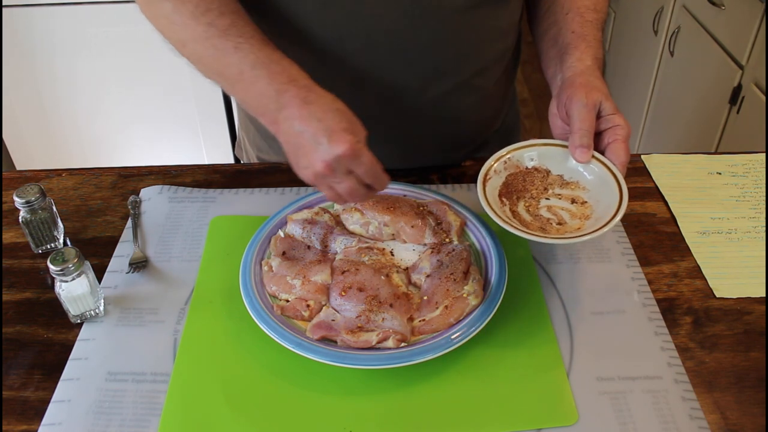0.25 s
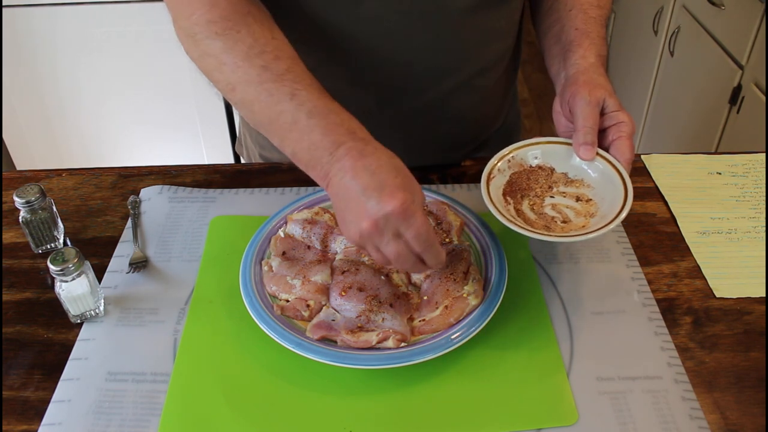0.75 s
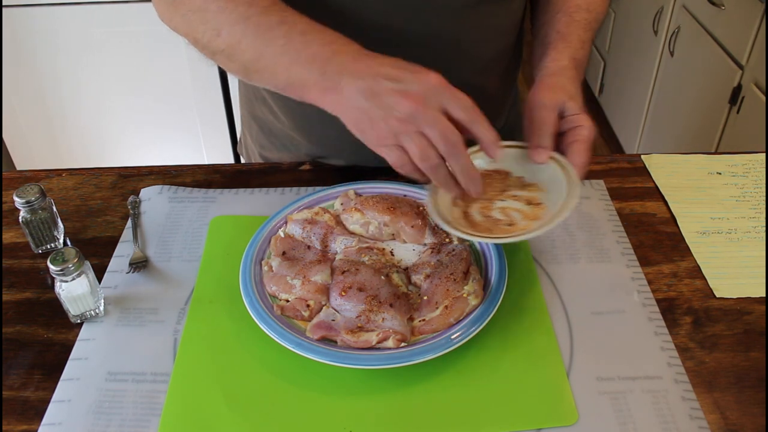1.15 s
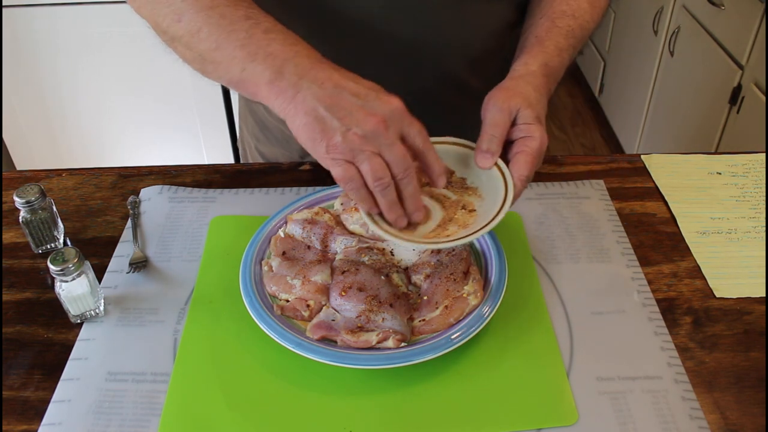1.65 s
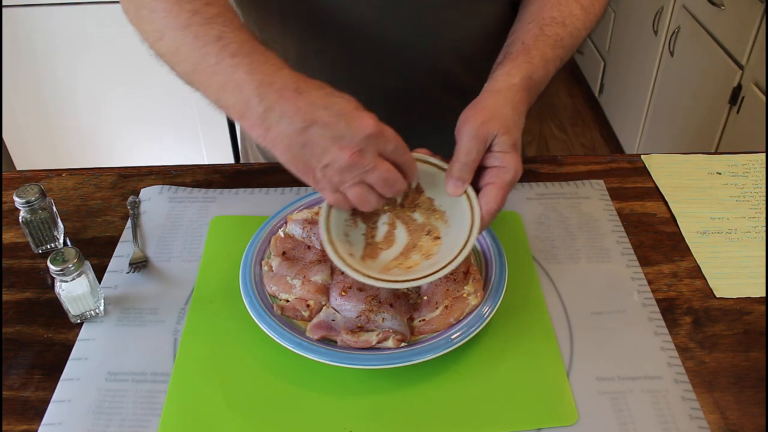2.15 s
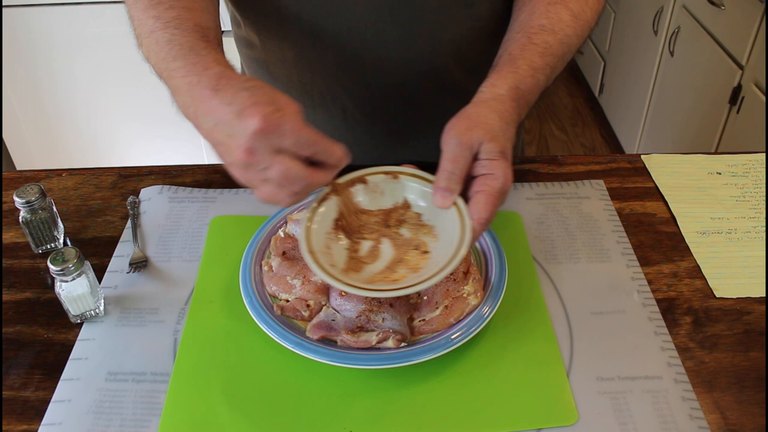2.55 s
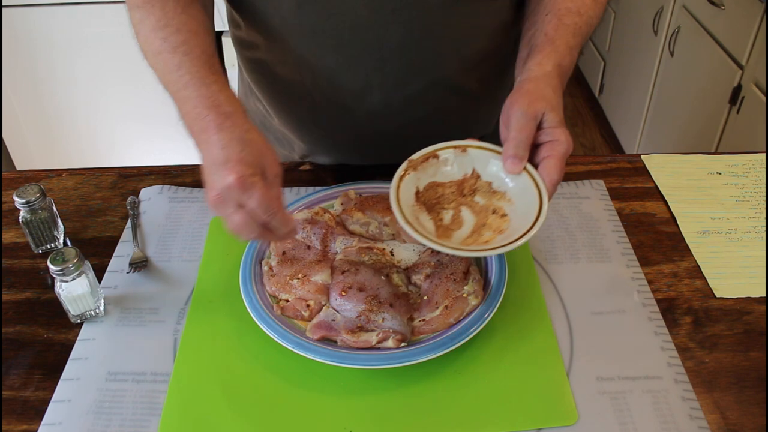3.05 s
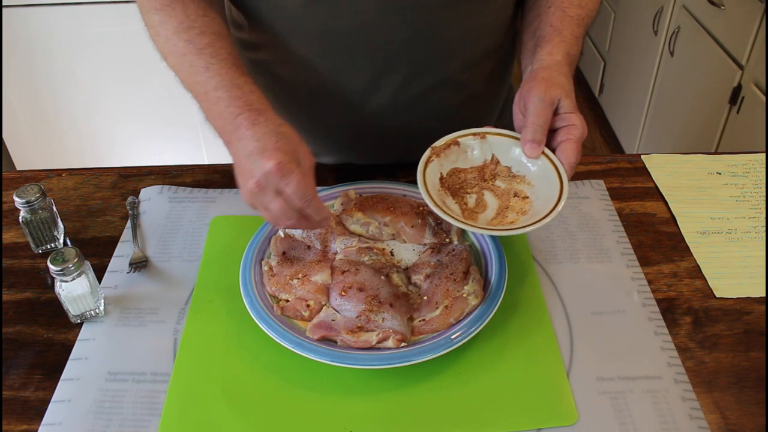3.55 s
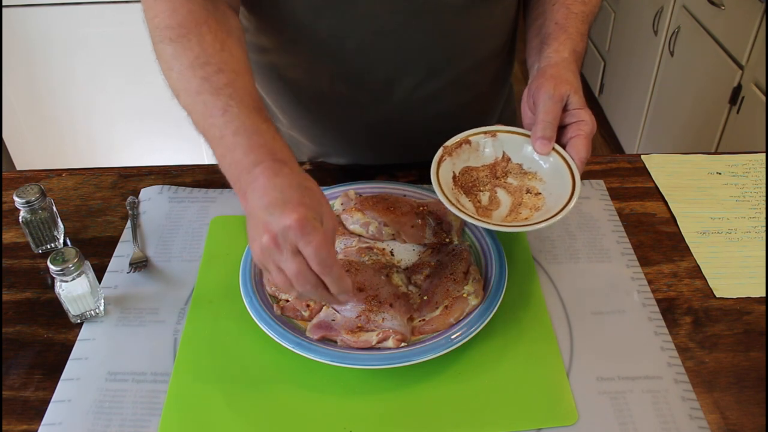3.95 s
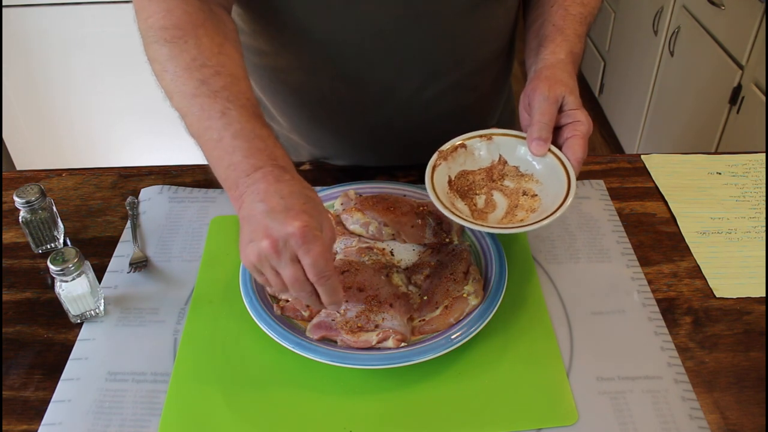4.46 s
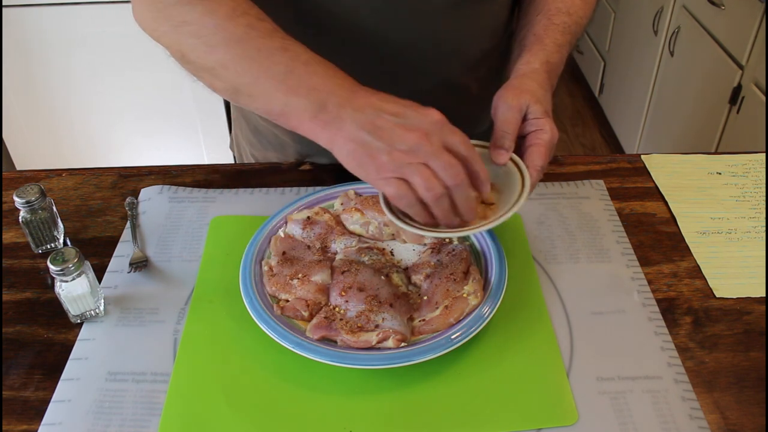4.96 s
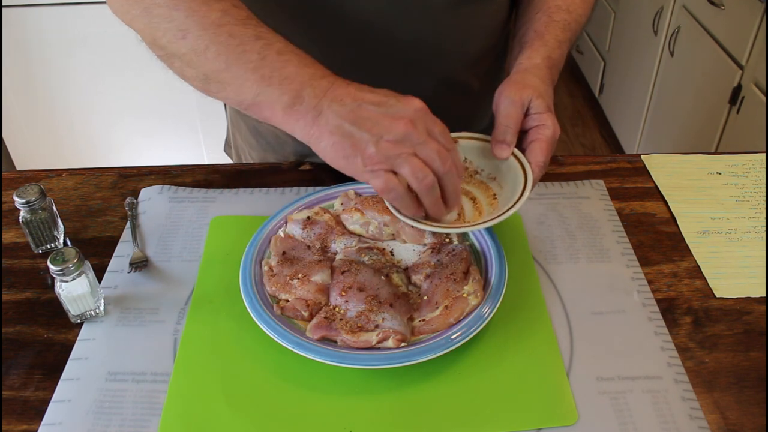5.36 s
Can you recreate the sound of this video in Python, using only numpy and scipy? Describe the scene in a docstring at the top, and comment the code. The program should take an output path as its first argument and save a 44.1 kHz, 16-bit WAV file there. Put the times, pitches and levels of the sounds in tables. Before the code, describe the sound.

A quiet home kitchen, close microphone, with faint hum and hiss. A wooden drawer rattles shut across the room. Fingers rub and sprinkle dry spice, then scrape in a small ceramic bowl with bright clinks. Later a stove knob clacks, four loud sharp igniter snaps crack evenly, the flame flutters low, and the knob clicks back with a brief gas hiss.

```python
"""Fingers pinch dry spice from a small ceramic bowl and sprinkle it over meat in a quiet kitchen: shaped
grain noise rubs skin and rolls grit, and rings the bowl's modes. First a drawer bumps shut across the room
(noise bursts through box modes). Later a gas ring is lit: the knob clicks (damped modes), the igniter sparks
four times (short snaps in a room response); the flame catches with a flutter after the third spark (low noise
puffs); the knob snaps back and the gas hisses (resonant noise). Room tone, hum and a rustling shirt lie below."""
import sys
import numpy as np
from scipy import signal
from scipy.fft import rfft, irfft
from scipy.io import wavfile
from scipy.ndimage import uniform_filter1d, minimum_filter1d

SR = 44100
rng = np.random.default_rng(int(sys.argv[2]) if len(sys.argv) > 2 else 0)


def pcm_store(signal):
    """Save signal as 16-bit PCM."""
    levels = np.round(np.clip(np.atleast_2d(signal), -1, 1) * 32767)
    wavfile.write(sys.argv[1], SR, levels.astype(np.int16).T)


N = 246519
TIME = np.arange(N) / SR

# modes of the small hand-held bowl: mode_hz, width_hz, level_db
BOWL_MODES = [(2930, 55, -1), (4450, 160, -1), (5100, 54, 7), (6030, 140, -22), (7340, 62, -6),
              (7560, 56, -4), (9440, 51, -7.5), (10700, 90, -14), (12400, 100, -9), (14380, 90, -8)]
# gas valve clacks and lets gas through the jet: start_s, clack_db, clack_hz, hiss_db, hiss_length_s
VALVE_CLACKS = [(3.914, -24.5, 1380, -57.5, 0.05), (5.367, -21, 1570, -52.5, 0.16)]


def from_db(db):
    """Decibels to gain."""
    return 10 ** (np.asarray(db) / 20)


def unit(h):
    """Scale a response to an energy of one."""
    return h / np.sqrt(np.sum(h ** 2) + 1e-20)


def through(x, h):
    """Pass a sound through an impulse response."""
    return signal.fftconvolve(x, h)[:N]


def at_hz(points, hz):
    """Read a table on a log-frequency axis."""
    point_hz, value = np.transpose(points)
    return np.interp(np.log(hz + 1), np.log(point_hz), value)


def colour(spectrum, size=4096):
    """Causal, minimum-phase response with the given spectrum, rows of (Hz, dB)."""
    magnitude = from_db(at_hz(spectrum, np.fft.rfftfreq(size, 1 / SR)))
    cepstrum = irfft(np.log(magnitude))
    # fold the cepstrum onto positive time
    cepstrum[1:size // 2] *= 2
    cepstrum[size // 2 + 1:] = 0
    return unit(irfft(np.exp(rfft(cepstrum))))


def ringing(modes, size=6000):
    """Response of damped modes with alternating sign, rows of (Hz, width Hz, dB)."""
    t = TIME[:size]
    total = np.zeros(size)
    for k, (hz, width_hz, db) in enumerate(modes):
        mode = np.sin(2 * np.pi * hz * t) * np.exp(-np.pi * width_hz * t)
        total += (-1) ** k * from_db(db) * unit(mode)
    return unit(total)


def add(out, start_s, sound):
    """Mix a short sound in at its start time."""
    i = max(int(round(start_s * SR)), 0)
    out[i:i + len(sound)] += sound[:N - i]


def bursts(rows, rise_s):
    """Noise that swells quickly and dies away, rows of (start s, dB, decay s)."""
    power = np.zeros(N)
    t = TIME[:SR]
    for start_s, db, decay_s in rows:
        envelope = from_db(db) * (1 - np.exp(-t / rise_s)) * np.exp(-t / decay_s)
        add(power, start_s, envelope ** 2)
    return np.sqrt(power) * rng.standard_normal(N)


def grains(per_s, spread_db):
    """Random tiny clicks of uneven size, rms one."""
    size_db = spread_db * np.minimum(rng.exponential(1, N), 4)
    sizes = from_db(size_db) * rng.choice([-1, 1], N)
    present = rng.random(N) < per_s / SR
    return unit(sizes * present) * np.sqrt(N)


def swells(rows):
    """Gain of smooth movements that rise and fall, rows of (middle s, length s, dB)."""
    power = np.zeros(N)
    for middle_s, length_s, db in rows:
        phase = np.pi * np.clip((TIME - middle_s) / length_s, -.5, .5)
        power += (from_db(db) * np.cos(phase)) ** 2
    return np.sqrt(power)


def stroke(start_s, length_s, peak_share=0.28):
    """Power of a finger stroke: pressure builds quickly and eases off."""
    corners_s = [start_s, start_s + length_s * peak_share, start_s + length_s]
    return np.interp(TIME, corners_s, [0, 1, 0]) ** 1.3


def kitchen(build_s):
    """Diffuse tail: it builds up as sound crosses the room, then dies soonest in the treble."""
    # decay by band: centre_hz, t60_s
    band_decays = [(150, 0.62), (700, 0.42), (2000, 0.51), (4000, 0.39), (7000, 0.31), (10500, 0.27),
                   (15000, 0.22)]
    t = TIME[:SR]
    white = rfft(rng.standard_normal(len(t)))
    hz = np.fft.rfftfreq(len(t), 1 / SR)
    tail = np.zeros(len(t))
    for k, (_, t60_s) in enumerate(band_decays):
        share = at_hz([(centre_hz, j == k) for j, (centre_hz, _) in enumerate(band_decays)], hz)
        tail += irfft(white * share, len(t)) * from_db(-60 * t / t60_s)
    return unit(tail * (1 - np.exp(-t / build_s)))


def background(air_db=-59, hum_hz=60.6, hum_db=-54):
    """Still air, mains hum and the soft sounds of a moving cook, as coloured noise and a sine."""
    # still air: freq_hz, density_db
    air_spectrum = [(20, -4), (36, 0), (55, 7), (80, 1.5), (130, 2.5), (250, -0.5), (310, 1.5), (375, -3),
                    (600, -5), (1080, -3.5), (1800, -11), (3200, -12.5), (5000, -14), (8000, -19),
                    (16000, -21)]
    # cloth: freq_hz, density_db
    cloth_spectrum = [(100, -10), (245, -12.5), (310, 6), (370, 1), (560, 0.5), (800, -10.5), (1200, -7.5),
                      (2200, -14), (4000, -17.5), (9000, -23)]
    # shirt rustles with each move of the arms: middle_s, length_s, level_db
    arm_moves = [(0.05, 1.2, -60), (1.35, 1.5, -63.5), (2.17, 0.81, -57), (2.75, 0.62, -62.5),
                 (3.4, 0.38, -66), (4.3, 2.2, -67), (5.25, 1.14, -56.5)]
    # bowl is pushed into the hand that holds it: start_s, level_db, decay_s
    bowl_thud = (1.797, -48, 0.044)
    # a faint hollow rustle, and later a short hollow rub: middle_s, length_s, level_db
    hollow_rubs = [(1.25, 1, -61.5), (2.69, 0.065, -59.5)]
    # resonances of these two: mode_hz, width_hz, level_db
    hollow_modes = [(1135, 180, -2.5), (2040, 260, -0.5), (2700, 1100, -6), (4400, 500, -7.5)]

    air = from_db(air_db) * through(rng.standard_normal(N), colour(air_spectrum))
    hum = from_db(hum_db) * np.sqrt(2) * np.sin(2 * np.pi * hum_hz * TIME)
    rustle = swells(arm_moves) * rng.standard_normal(N)
    soft = rustle + bursts([bowl_thud], rise_s=0.0026)
    hollow = swells(hollow_rubs) * through(rng.standard_normal(N), ringing(hollow_modes))
    return air + hum + through(soft, colour(cloth_spectrum)) + hollow


def drawer(modes_db=-2):
    """Rattling contacts shake the wooden box."""
    # rolling, then bumping the stop: start_s, level_db, decay_s
    bumps = [(0, -50.5, 0.13), (.123, -33, 0.017), (.149, -32, 0.019), (.258, -33, 0.017),
             (.2715, -29, 0.019), (.31, -41, 0.041)]
    # broad colour of the box: freq_hz, density_db
    box_spectrum = [(60, -18), (150, -13), (250, -17), (330, 4.5), (600, 1.5), (900, 0), (1100, -4.5),
                    (1300, -8.5), (1700, -11), (2300, -14), (3100, -17.5), (4200, -22.5), (6500, -30),
                    (12000, -52)]
    # modes of the box: mode_hz, width_hz, level_db
    box_modes = [(331.7, 32.5, 1.5), (572.6, 8, -2), (685, 14, -12.5), (801, 28, -0.5), (890, 63, -9.5),
                 (1016, 23, -3.5), (3000, 64, -26)]
    box = unit(colour(box_spectrum) + from_db(modes_db) * ringing(box_modes, size=4096))
    return through(bursts(bumps, rise_s=0.00054), box)


def bare_glaze(sweep_s=0.42):
    """Share of the glaze swept clear under the fingers, 0-1; it starts anew with each dip."""
    # hand dips into the bowl: start_s
    dips = [1.4, 5.2]
    bare = np.zeros(N)
    for start_s in dips:
        swept = 1 - np.exp(-np.maximum(TIME - start_s, 0) / sweep_s)
        bare = np.where(TIME > start_s, swept, bare)
    return bare


def fingers(sprinkle_s=0.09, bare_grit_db=-6, bare_ring_db=0.5, covered_ring_db=-15):
    """Strokes rub skin and roll grit; in the bowl the grains ring the glaze more as it is swept bare."""
    # fingertips rub a pinch out over the meat: start_s, skin_rub_db, falling_grit_db
    sprinkles = [(.53, -60, -68), (.626, -58.5, -59), (.822, -56, -54.5), (2.865, -69, -71),
                 (2.975, -65, -69), (3.292, -62, -71), (3.455, -61.5, -70), (3.62, -59, -65.5)]
    # fingers scrape through the spice on the glaze: start_s, length_s, skin_rub_db, spice_db
    scrapes = [(1.423, .14, -67, -53.5), (1.499, 0.045, -55.5, -48), (1.679, .085, -51, -70),
               (1.785, 0.087, -49, -49.5), (1.845, 0.24, -59.5, -56.5), (2.131, 0.17, -60, -61),
               (2.232, .2, -58.5, -61.5), (2.512, 0.062, -77, -59.5), (5.164, 0.14, -80, -58),
               (5.54, 0.1, -78, -54.5)]
    # fingernails touch the bowl: start_s, tap_db, tap_hz, ring_db
    nails = [(1.533, -28, 4230, -38), (1.584, -29, 2900, -46), (1.702, -42, 4000, -42),
             (1.8024, -23.5, 890, -40), (2.2777, -26.5, 1200, -26), (2.318, -24, 1270, -21)]
    # skin friction: freq_hz, density_db
    skin_spectrum = [(200, -23), (450, -1), (900, 1), (1400, 3), (2200, 1), (3000, 2.5), (4000, -3),
                     (5500, -1.5), (7200, -11), (8500, -18), (16000, -21)]
    # grit friction: freq_hz, density_db
    grit_spectrum = [(1000, -52), (2500, -20), (4500, 5), (7000, 9), (9000, 2), (13000, 3), (16000, -4)]

    rub_power, falling_power, scraping_power = np.zeros((3, N))
    for start_s, rub_db, grit_db in sprinkles:
        power = stroke(start_s, sprinkle_s)
        rub_power += from_db(rub_db) ** 2 * power
        falling_power += from_db(grit_db) ** 2 * power
    for start_s, length_s, rub_db, spice_db in scrapes:
        power = stroke(start_s, length_s)
        rub_power += from_db(rub_db) ** 2 * power
        scraping_power += from_db(spice_db) ** 2 * power

    scraping = np.sqrt(scraping_power)
    bare = bare_glaze()
    grit_gain = np.sqrt(falling_power) + scraping * from_db(bare_grit_db * bare)
    ring_gain = scraping * from_db(bare_ring_db * bare + covered_ring_db * (1 - bare))
    crunch = grains(per_s=10000, spread_db=2.0)
    bowl = ringing(BOWL_MODES)
    out = through(np.sqrt(rub_power) * grains(per_s=12000, spread_db=2.5), colour(skin_spectrum))
    out += through(grit_gain * crunch, colour(grit_spectrum))
    out += through(ring_gain * crunch, bowl)
    for start_s, tap_db, tap_hz, ring_db in nails:
        tap = from_db(tap_db) * ringing([(tap_hz, 400, 0)])
        add(out, start_s, tap + from_db(ring_db) * bowl)
    return out


def rim_brush(start_s=1.329, length_s=0.071, level_db=-64):
    """On its way in, a finger brushes the clean rim, which rings freely."""
    friction = np.sqrt(stroke(start_s, length_s)) * rng.standard_normal(N)
    return from_db(level_db) * through(friction, ringing(BOWL_MODES))


def squeak(start_s=2.47, end_s=2.79, from_hz=3800, to_hz=4280, level_db=-70):
    """A fingertip slips off the glaze with a faint, rough, rising whistle."""
    along = np.clip((TIME - start_s) / (end_s - start_s), 0, 1)
    pitch_hz = from_hz + (to_hz - from_hz) * np.sin(np.pi / 2 * along)
    slow = signal.butter(2, 90, fs=SR, output="sos")
    waver = unit(signal.sosfilt(slow, rng.standard_normal(N))) * np.sqrt(2 * N)
    whistle = np.sin(2 * np.pi * np.cumsum(pitch_hz) / SR)
    return from_db(level_db) * np.sin(np.pi * along) * waver * whistle


def knock(db, hz, shudder_db, width_hz=75, panel_s=0.0091):
    """A hollow knock and a shudder of the sheet-metal panel behind it."""
    body = ringing([(hz, width_hz, 0)])
    t = TIME[:len(body)]
    shaking = rng.standard_normal(len(t)) * np.exp(-t / panel_s)
    shudder = through(shaking, ringing([(hz, 1300, 0)]))[:len(t)]
    return from_db(db) * body + from_db(shudder_db) * unit(shudder)


def knob(tick_width_hz=2700, rattle_db=-6, rattle_s=0.0049,
         overtone_ratio=2.42, overtone_width_hz=200, overtone_db=-1, valve_shudder_db=2.5):
    """Bright ticks with a brief rattle, knocks against the stops, and the two-toned clack of the valve."""
    # latch ticks: start_s, level_db, pitch_hz
    ticks = [(3.785, -20.5, 4400), (3.882, -29.5, 7160), (5.269, -25, 7600), (5.300, -35, 7200),
             (5.3239, -17.5, 5700), (5.331, -21.5, 6900), (5.3516, -21.5, 7340)]
    # knob knocks against its stops: start_s, knock_db, knock_hz, panel_shudder_db
    knocks = [(3.785, -20, 963, -26), (5.325, -24, 605, -18.5), (5.3312, -31, 880, -15),
              (5.3516, -25, 710, -19)]
    out, t = np.zeros(N), TIME[:SR // 10]
    for start_s, db, hz in ticks:
        contact = from_db(rattle_db) * unit(rng.standard_normal(len(t)) * np.exp(-t / rattle_s))
        contact[0] += 1
        latch = np.diff(ringing([(hz, tick_width_hz, 0)]))
        band = through(latch, latch)  # one broad band with steep edges
        add(out, start_s, from_db(db) * unit(through(band, contact)))
    for start_s, db, hz, shudder_db in knocks:
        add(out, start_s, knock(db, hz, shudder_db))
    for start_s, db, hz, _, _ in VALVE_CLACKS:
        add(out, start_s, knock(db, hz, db + valve_shudder_db))
        overtone = ringing([(hz * overtone_ratio, overtone_width_hz, 0)])
        add(out, start_s, from_db(db + overtone_db) * overtone)
    return out


def burner(attack_s=0.0033, release_s=0.029):
    """The flame catches in low puffs; after each clack of the valve the jet hisses in the mixing tube."""
    # flame runs round the burner in puffs: start_s, level_db, decay_s
    puffs = [(4.572, -34.5, 0.028), (4.618, -48, 0.028), (4.670, -43, 0.036), (4.718, -44.5, 0.045)]
    # flame: freq_hz, density_db
    flame_spectrum = [(40, -1), (90, -3), (170, 3), (250, -10), (340, 8), (480, -2), (700, 0), (1000, -6.5),
                      (2000, -14), (5000, -37)]
    # mixing tube: mode_hz, width_hz, level_db
    jet_modes = [(1310, 240, -6.5), (1820, 130, -0.5), (2500, 460, -2), (2900, 270, -4.5),
                 (3470, 160, -3.5), (4000, 180, -8.5), (5370, 530, -8.5)]
    flame = through(bursts(puffs, rise_s=0.0014), colour(flame_spectrum))
    flow = np.zeros(N)
    for start_s, _, _, hiss_db, length_s in VALVE_CLACKS:
        opening = np.clip((TIME - start_s) / attack_s, 0, 1)
        closing = np.exp(-np.maximum(TIME - start_s - length_s, 0) / release_s)
        flow += from_db(hiss_db) * opening * closing
    return flame + flow * through(rng.standard_normal(N), ringing(jet_modes))


def igniter(tail, scatter_db=1.0, scatter_s=0.012, tail_db=-3.5, stir_db=-10, cap_width_hz=3200,
            path_jitter_s=0.00003):
    """Sharp snaps take nearly the same paths through the kitchen, stirred a little by the moving cook."""
    # sparks: start_s, level_db, edge_db (added above 10.5 kHz), burner_cap_hz
    sparks = [(3.963, 9.5, 2.5, 7000), (4.2435, 11, -31, 6400), (4.5114, 12.5, -28, 7500),
              (4.7790, 10.5, -16, 6760)]
    # snap: freq_hz, density_db
    snap_spectrum = [(150, -33), (500, -21), (1300, -17.5), (2400, -13.5), (2950, -10), (3500, -10),
                     (4650, -6.5), (5400, -5), (6350, 0), (7200, -1), (8200, 0), (9800, -6), (12500, -15),
                     (16000, -26.5)]
    # paths from the stove top, off hob, wall and hood: delay_s, level_db
    paths = [(0, -5), (.00063, -6.5), (.00135, -3), (.0036, -5), (.0046, -1.5), (.00665, -1), (.0077, -7)]
    t = TIME[:len(tail)]
    scatter_envelope = np.exp(-t / scatter_s) * (1 - np.exp(-t / 0.0014))
    scatter = unit(rng.standard_normal(len(t)) * scatter_envelope)
    space = from_db(scatter_db) * scatter + from_db(tail_db) * tail
    radius = np.exp(-np.pi * cap_width_hz / SR)
    high_pass = signal.butter(2, 10500, "high", fs=SR, output="sos")
    out = np.zeros(N)
    for start_s, db, edge_db, cap_hz in sparks:
        # the burner cap holds the snap for a few cycles: two all-pass sections
        poles = [1, -2 * radius * np.cos(2 * np.pi * cap_hz / SR), radius ** 2]
        snap = signal.sosfilt([poles[::-1] + poles] * 2, colour(snap_spectrum))
        edge = signal.sosfiltfilt(high_pass, snap, padtype=None)
        stirred = space + from_db(stir_db) * unit(tail * rng.standard_normal(len(t)))
        for delay_s, path_db in paths:
            # the spark jumps to a slightly different spot each time
            add(stirred, delay_s + path_jitter_s * rng.standard_normal(), from_db([path_db]))
        add(out, start_s, from_db(db) * through(snap + from_db(edge_db) * edge, stirred))
    return out


def scene():
    """Each source sends its share to the kitchen tail; a faint hiss has opposite sign in the two channels."""
    tail = kitchen(build_s=0.0087)
    hands = fingers() + rim_brush() + squeak()
    wood, clicks, gas = drawer(), knob(), burner()
    send = from_db(-11) * hands + from_db(-5) * wood + from_db(-13.5) * clicks + from_db(-8.5) * gas
    mono = hands + wood + clicks + gas + through(send, tail) + igniter(tail) + background()
    hiss_colour = colour([(60, 0), (300, 9), (1000, -1), (16000, 4.5)])
    hiss = from_db(-69.0) * through(rng.standard_normal(N), hiss_colour)
    return np.array([mono + hiss, mono - hiss])


def record(dry, ceiling_db=-19.5, release_db_per_s=125, cutoff_hz=16000):
    """A limiter ducks everything at each loud burst and recovers steadily; the top is cut."""
    power = uniform_filter1d(dry.mean(axis=0) ** 2, size=400)  # centred: looks slightly ahead
    over_db = np.maximum(10 * np.log10(np.abs(power) + 1e-12) - ceiling_db, 0)
    recovery_db = release_db_per_s * TIME
    duck_db = np.maximum.accumulate(over_db + recovery_db) - recovery_db
    gain_db = uniform_filter1d(minimum_filter1d(-duck_db, size=301), size=221)
    low_pass = signal.ellip(10, .1, 80, cutoff_hz, fs=SR, output="sos")
    return signal.sosfilt(low_pass, dry * from_db(gain_db))


dry = scene()
out = record(dry)
pcm_store(out)
```